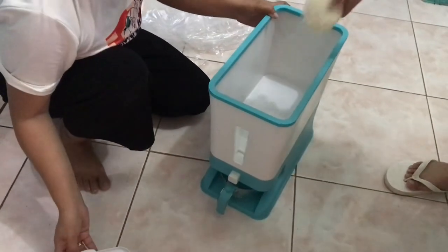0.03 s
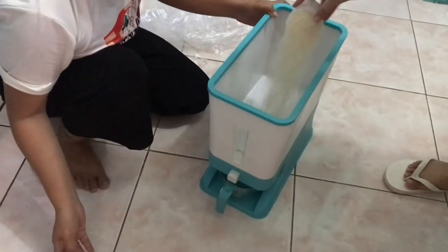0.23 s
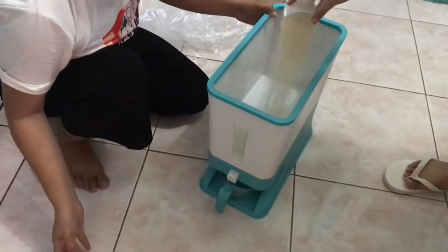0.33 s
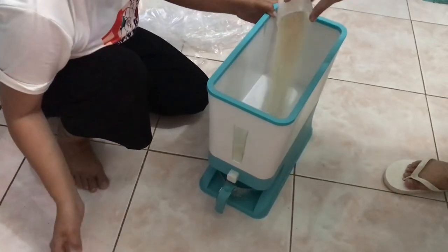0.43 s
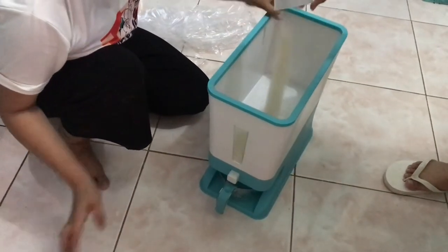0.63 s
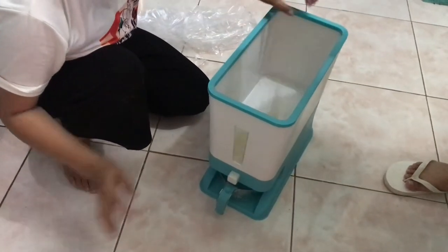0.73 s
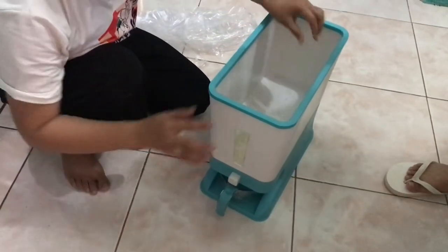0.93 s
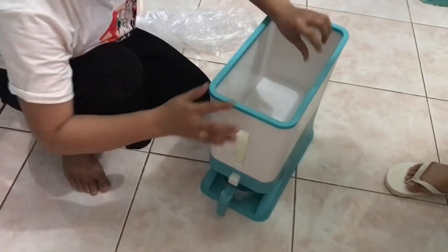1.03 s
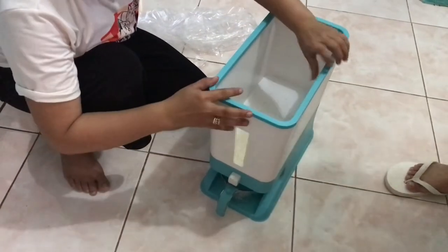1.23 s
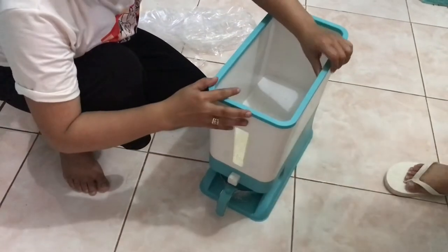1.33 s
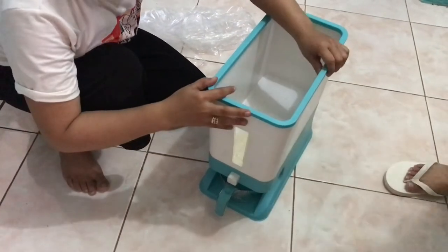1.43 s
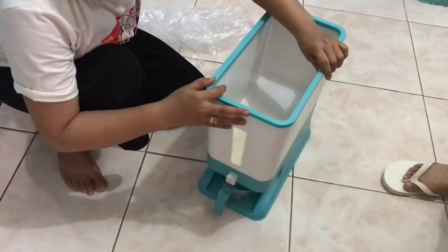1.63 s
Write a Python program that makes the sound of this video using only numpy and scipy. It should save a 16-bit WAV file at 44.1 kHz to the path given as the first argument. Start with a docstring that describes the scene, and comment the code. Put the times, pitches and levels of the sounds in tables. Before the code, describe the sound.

Rice pours into an empty plastic bin, about a metre away. Clumps click at 0.1 seconds, then a hissing, drumming rush peaks near 0.3, with a tap on the rim at 0.4. The stream weakens with a hollow boom and thins to single grains by 1.1. A light plastic knock comes at 1.4, with faint hand rubbing and soft thuds until 1.7. The small room hums quietly.

```python
"""Rice poured into a plastic bin

Rice is tipped from a cup into an empty bin on a tiled floor, about a metre away. A few clumps land,
then the stream rushes in and drums on the panels until the growing heap muffles it and it thins to
single grains. A light plastic knock follows and hands grip the bin. Small quiet room, low hum."""
import sys
import numpy as np
from scipy import signal
from scipy.fft import rfft, irfft
from scipy.io import wavfile

SR = 44100
rng = np.random.default_rng(int(sys.argv[2]) if len(sys.argv) > 2 else 0)


def int16_out(signal):
    """Quantize to a 16-bit WAV file."""
    q = np.round(np.clip(np.atleast_2d(signal).T, -1, 1) * 32767)
    wavfile.write(sys.argv[1], SR, q.astype(np.int16))


N = 74970


def amp(db):
    """Decibels to gain."""
    return 10 ** (np.asarray(db) / 20)


def times():
    """Sample times in s."""
    return np.arange(N) / SR


def unit(response):
    """Scale to unit energy."""
    return response / np.sqrt(np.sum(response ** 2))


def through(x, response):
    """Convolve, cut to N samples."""
    return signal.fftconvolve(x, response)[:N]


def highpass(x, hz, order):
    """Butterworth high-pass."""
    return signal.sosfilt(signal.butter(order, hz, "high", fs=SR, output="sos"), x)


def colour(points, size=8192):
    """Minimum-phase, unit-energy response from (f/Hz, level/dB) points."""
    hz, db = np.array(points, float).T
    bins_hz = np.maximum(np.arange(size // 2 + 1) * SR / size, 1)
    gain = amp(np.interp(np.log(bins_hz), np.log(hz), db))
    cepstrum = irfft(np.log(gain))
    cepstrum[1:size // 2] *= 2
    cepstrum[size // 2 + 1:] = 0
    return unit(irfft(np.exp(rfft(cepstrum))))


def curve(points):
    """Gain over time from (t/s, level/dB) points."""
    return amp(np.interp(times(), *np.array(points).T))


def fade(t60_s):
    """Exponential decay, 60 dB in t60_s."""
    return np.exp(-np.log(1000) * times() / t60_s)


def swell(centre_s, half_width_s):
    """Gaussian rise and fall."""
    return np.exp(-((times() - centre_s) / half_width_s) ** 2)


def burst(start_s, db, decay_s):
    """Cluster of tiny contacts: instant attack, quick decay."""
    age_s = times() - start_s
    envelope = amp(db) * (age_s >= 0) * np.exp(-np.abs(age_s) / decay_s)
    return envelope * rng.choice([-1, 1], N)


def resonance(hz, width_hz):
    """Impulse response of one damped resonance."""
    return width_hz * np.exp(-np.pi * width_hz * times()) * np.cos(2 * np.pi * hz * times())


def ring(modes):
    """Free ringing of (f/Hz, level/dB, T60/s) modes."""
    return sum(amp(db) * fade(t60_s) * np.sin(2 * np.pi * hz * times()) for hz, db, t60_s in modes)


def room(x, wet_db, split_hz=3000, delay_s=0.00502):
    """Add the tiled room's reverberation; treble dies sooner."""
    low = signal.sosfilt(signal.butter(2, split_hz, fs=SR, output="sos"), rng.standard_normal(N))
    high = highpass(rng.standard_normal(N), split_hz, order=2)
    tail = (low * fade(t60_s=0.31) + high * fade(t60_s=0.12)) * (times() > delay_s)
    return x + amp(wet_db) * through(x, unit(tail))


# Room noise: f/Hz, level/dB
AIR_SPECTRUM = [(25, -1), (38, -26), (50, -5.5), (90, -1), (200, -8), (500, -13.5), (1500, -15),
                (4000, -19), (8000, -24), (15500, -28.5)]
def background(hum_hz=58.4, hum_rms_db=-57.5, air_db=-60.5):
    """Steady low hum over faint room noise."""
    hum = np.sqrt(2) * amp(hum_rms_db) * np.sin(2 * np.pi * hum_hz * times())
    air = through(rng.standard_normal(N), colour(AIR_SPECTRUM))
    return hum + amp(air_db) * highpass(air, hz=40, order=4)


# Palm friction: f/Hz, level/dB
SLIDE_SPECTRUM = [(500, -25), (1500, -8), (2800, 1.5), (5000, -3), (9000, -3), (15000, -9)]
# Hand presses: t/s, level/dB, half-width/s
PRESSES = [(1.388, -53.5, 0.01), (1.447, -57.5, 0.043), (1.521, -56.5, 0.022), (1.576, -58, 0.016),
           (1.621, -54, 0.011), (1.648, -53, 0.02), (1.69, -61, 0.02)]
# Gripped bin: f/Hz, level/dB
THUD_SPECTRUM = [(40, -13), (80, 3.5), (180, 1.5), (320, -1), (500, -11), (1500, -16.5), (5000, -65)]
def hands():
    """A finger catches on the rim, the palm slides along it, the gripped bin thuds softly."""
    catch = burst(start_s=1.317, db=-62, decay_s=0.023)
    rub = through(catch, unit(resonance(hz=2280, width_hz=200)))
    friction = amp(-59) * swell(centre_s=1.375, half_width_s=0.085) * rng.standard_normal(N)
    slide = through(friction, colour(SLIDE_SPECTRUM))
    pressure = sum(amp(db) * swell(t_s, half_width_s) for t_s, db, half_width_s in PRESSES)
    thuds = through(pressure * rng.standard_normal(N), colour(THUD_SPECTRUM))
    return room(rub + slide + thuds, wet_db=-8)


# Knock and rebounds: t/s, level/dB
KNOCK_BLOWS = [(1.4065, -27.5), (1.4087, -32.5), (1.4096, -36), (1.418, -43)]
# Plastic clack: f/Hz, level/dB
CLACK_SPECTRUM = [(150, -18), (330, -21), (480, -5.5), (700, -7), (900, 2.5), (1500, -4.5), (2000, 2.5),
                  (2900, -1), (3700, -5.5), (5000, -17.5), (8500, -20), (10500, -26.5), (15000, -25)]
# Ring of the plastic: f/Hz, level/dB, T60/s
PLASTIC_MODES = [(898, 4, 0.2), (1006, -3, .12), (1362, -2, .16), (1600, -7, .26), (1775, -2, 0.34),
                 (2210, -7, .09), (2560, -7, .09), (3590, 1, 0.045)]
def knock(ring_db=-10):
    """A light blow on plastic: sharp clack, brief ring."""
    blows = sum(burst(t_s, db, decay_s=0.0031) for t_s, db in KNOCK_BLOWS)
    clack = through(blows, colour(CLACK_SPECTRUM))
    ringing = through(blows, unit(ring(PLASTIC_MODES)))
    return room(clack + amp(ring_db) * ringing, wet_db=-6)


# Contacts on the rim: t/s, level/dB, contact sigma/s
RIM_CONTACTS = [(.001, -42.5, 0.00012), (0.16, -31.5, 0.00012), (0.225, -37, 0.000035),
                (0.4089, -28, 0.000057), (0.4149, -19.5, 0.000023), (0.425, -31, 0.000042),
                (.438, -22, 0.00021), (1.683, -40, 0.00017)]
# Ring of the rim: f/Hz, level/dB, T60/s
RIM_MODES = [(1016, -26, 0.032), (1162, -4, 0.048), (1468, -5, 0.018), (1800, -5.5, .016),
             (2014, -4, 0.021), (2550, -4.5, .012)]
def rim_bumps(highpass_hz=714):
    """Cup or hand bumps the thin rim; a longer, softer contact rings only its low modes."""
    pushes = [(swell(t_s, np.sqrt(2) * sigma_s), db) for t_s, db, sigma_s in RIM_CONTACTS]
    force = sum(amp(db) * push / push.sum() for push, db in pushes)
    ringing = through(force, ring(RIM_MODES))
    return room(highpass(ringing, highpass_hz, order=2), wet_db=-6)


# Stream strength: t/s, level/dB
STREAM_FLOW = [(0, -60.5), (.11, -60.5), (.14, -45), (0.237, -40), (0.249, -26.5), (0.279, -21), (.35, -22),
               (0.461, -27.5), (.56, -28), (0.649, -31), (.73, -35), (.85, -36), (.96, -46.5), (1.07, -50),
               (1.2, -60), (1.33, -66), (1.45, -74)]
def grains(full_rate_per_s=11000, full_flow_db=-22.5, spread_db=2):
    """Random impacts of uneven size; their rate follows the square root of the stream's amplitude."""
    flow = curve(STREAM_FLOW)
    rate_per_s = full_rate_per_s * np.sqrt(flow / amp(full_flow_db))
    chance = np.minimum(rate_per_s / SR, 1)
    sizes = amp(spread_db * np.clip(rng.standard_normal(N), -2, 2)) * rng.choice([-1, 1], N)
    lands = rng.random(N) < chance
    return flow * lands * sizes / np.std(sizes) / np.sqrt(chance)  # RMS follows flow


def wall_echoes(impacts, spots=16, t60_s=0.023, echo_db=2):
    """Grains land on different spots, each with its own echoes between the bin's walls."""
    spot = rng.integers(spots, size=N)
    direct = times() == 0
    echoed = np.zeros(N)
    for k in range(spots):
        echoes = amp(echo_db) * unit(rng.standard_normal(N) * fade(t60_s))
        echoed += through(impacts * (spot == k), unit(direct + echoes))
    return echoed


# Boom gain on the stream: t/s, level/dB
BOOM_GAIN = [(.29, -27), (.44, -39), (.55, -31), (.65, -20.5), (.75, -21.5), (.87, -25), (1.1, -23.5)]
def boom(stream):
    """The stream drives the deep resonance of the whole bin."""
    return through(stream * curve(BOOM_GAIN), unit(resonance(hz=180, width_hz=41)))


# Panel resonances: f/Hz, width/Hz, level/dB
PANEL_MODES = [(351.4, 25.4, 7), (381, 37, 0), (423, 30, -1), (517, 26, -8), (648, 74, -9), (1144, 44, 3),
               (1366, 235, -4.5), (1633, 23, 1.5), (1797, 140, -7.5), (2227, 128, -2)]
# Drumming gain on the stream: t/s, level/dB
DRUMMING_GAIN = [(.12, -11.5), (.22, -10.5), (.27, -8), (.35, -8.5), (.38, -13.5), (.52, -13.5), (.57, -8),
                 (.6, -16.5), (.65, -7.5), (.72, -10), (.76, -12.5), (1.1, -15)]
def drumming(highpass_hz=288):
    """Grains drum on the bin's small panels, which radiate little bass."""
    modes = sum(amp(db) * resonance(hz, width_hz) for hz, width_hz, db in PANEL_MODES)
    panels = unit(highpass(modes, highpass_hz, order=4))
    return through(grains() * curve(DRUMMING_GAIN), panels)


# Clumps and stray grains: t/s, level/dB, decay/s
CLUMP_HITS = [(0.1237, -20.5, 0.0014), (0.1275, -22.5, 0.00085), (0.1352, -26.5, 0.0036),
              (.158, -26, 0.0039), (0.1827, -25.5, 0.0008), (0.1934, -30, 0.0022), (0.213, -30, 0.0014),
              (0.2171, -23.5, 0.0017), (0.226, -28, 0.0028), (0.929, -33, 0.0022), (1.032, -36.5, 0.0011),
              (1.571, -61, 0.0018), (1.671, -56, 0.0017)]
# Grain click: f/Hz, level/dB
CLICK_SPECTRUM = [(100, -23), (300, -21), (600, -10), (800, -12.5), (1200, -9.5), (2300, -11.5),
                  (3000, -7.5), (4300, -5), (5000, -9), (6500, -3.5), (7700, -7), (9500, -2), (10300, -5.5),
                  (11500, -1), (13200, -4), (15200, 0.5)]
def clicks(stream):
    """Grains and clumps click in the bin; dense clicks merge into hiss."""
    clumps = sum(burst(*hit) for hit in CLUMP_HITS)
    clumps = highpass(clumps, hz=1450, order=2)  # too light to stir the low modes
    return through(wall_echoes(stream + clumps), colour(CLICK_SPECTRUM))


def rice(click_db=2.5):
    """The pour: grains click, drum on the panels and make the bin boom."""
    stream = grains()
    return room(amp(click_db) * clicks(stream) + drumming() + boom(stream), wet_db=-12.5)


def scene():
    """All sources, identical in both channels."""
    return np.tile(rice() + rim_bumps() + knock() + hands() + background(), (2, 1))


def record(dry, cutoff_hz=15780):
    """Steep low-pass on the top of the treble."""
    return signal.sosfilt(signal.ellip(12, .1, 80, cutoff_hz, fs=SR, output="sos"), dry)


dry = scene()
out = record(dry)
int16_out(out)
```